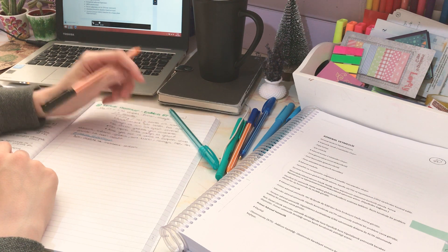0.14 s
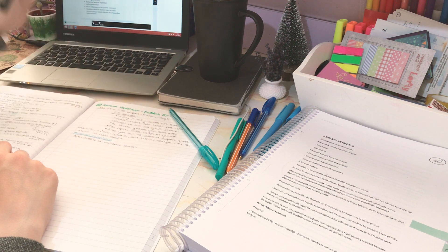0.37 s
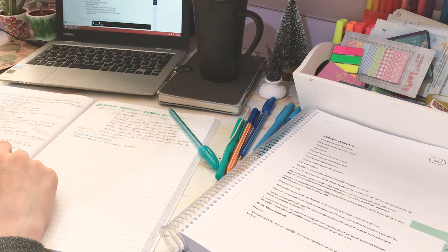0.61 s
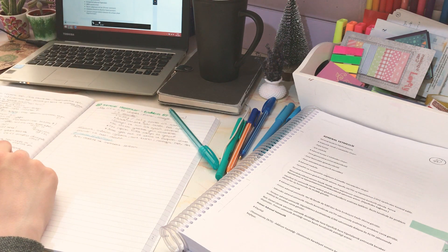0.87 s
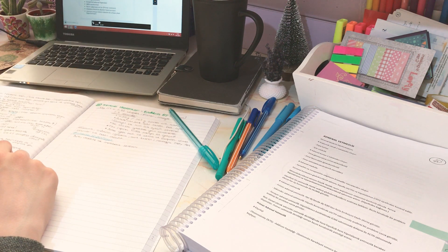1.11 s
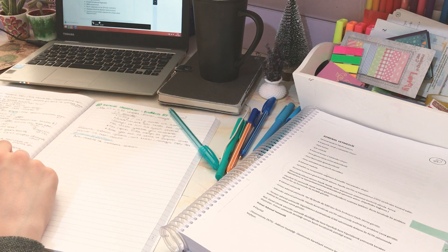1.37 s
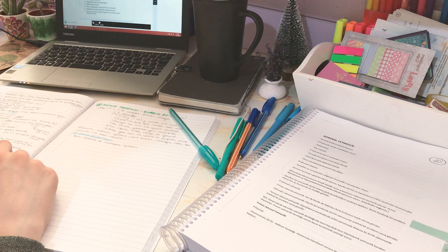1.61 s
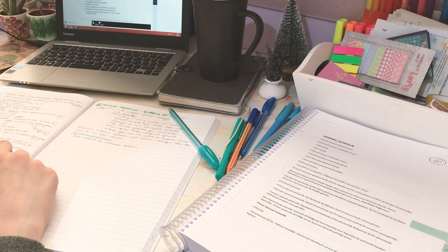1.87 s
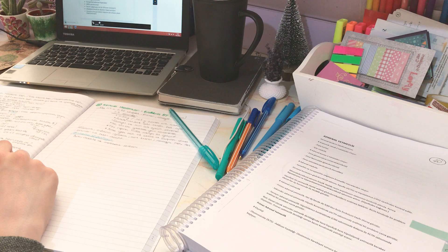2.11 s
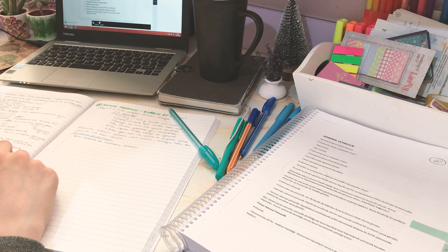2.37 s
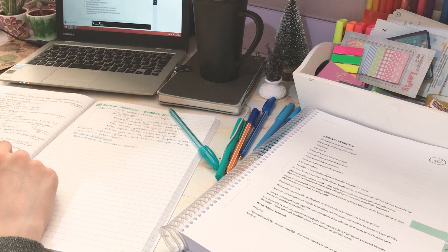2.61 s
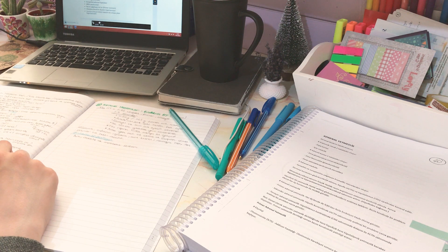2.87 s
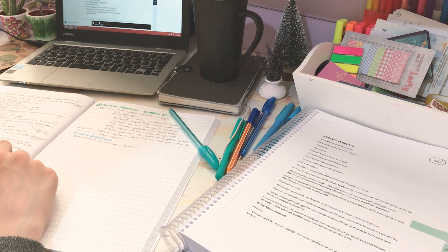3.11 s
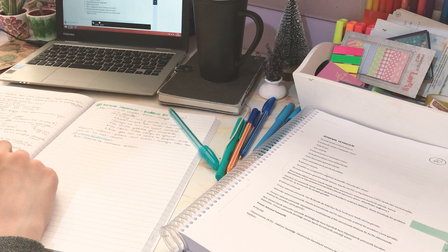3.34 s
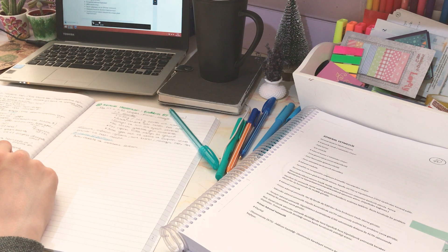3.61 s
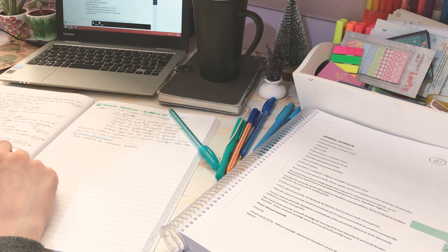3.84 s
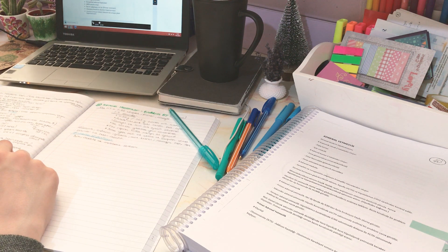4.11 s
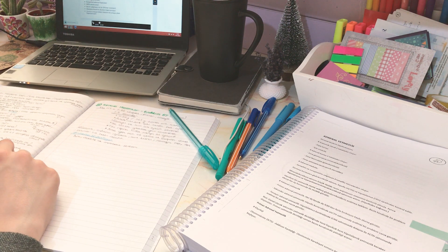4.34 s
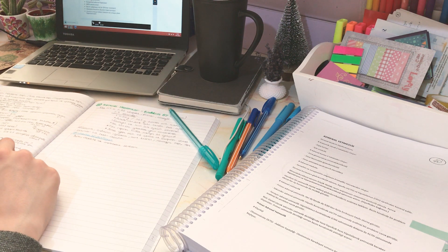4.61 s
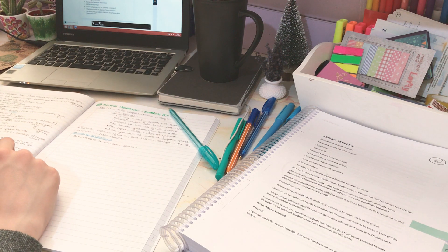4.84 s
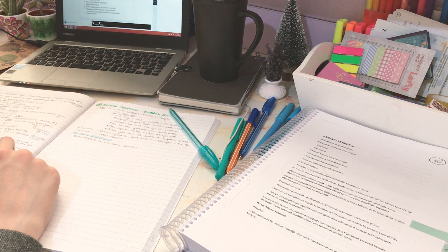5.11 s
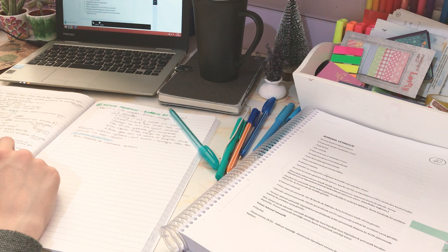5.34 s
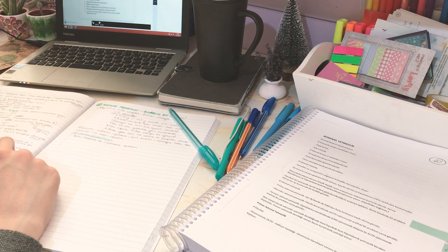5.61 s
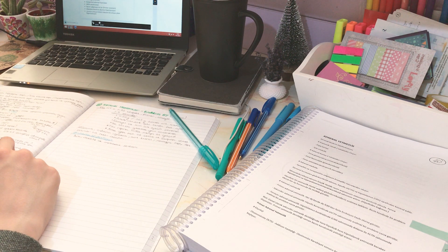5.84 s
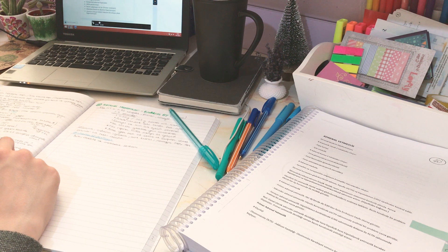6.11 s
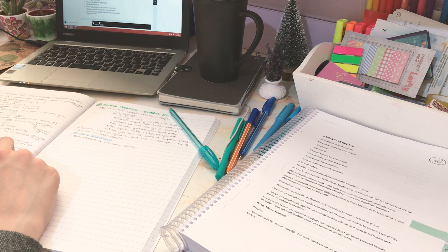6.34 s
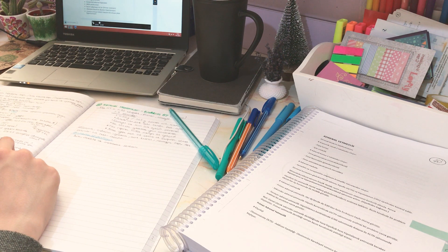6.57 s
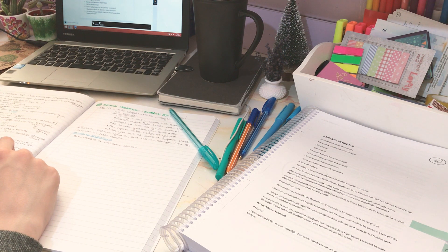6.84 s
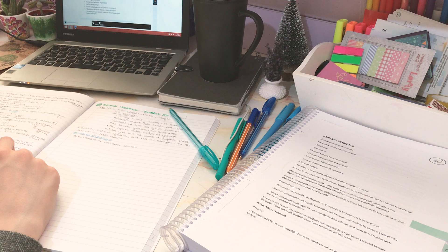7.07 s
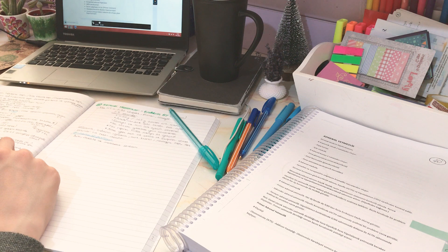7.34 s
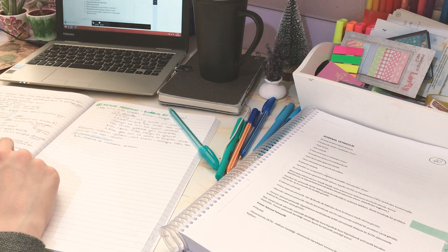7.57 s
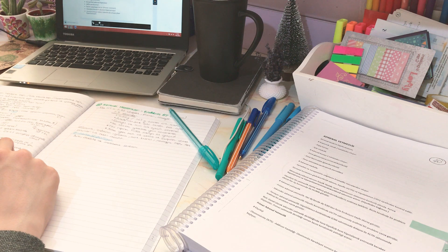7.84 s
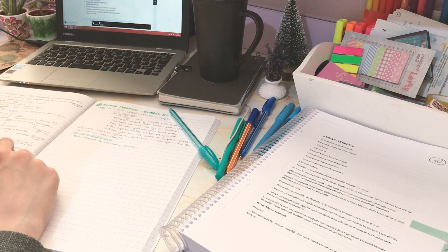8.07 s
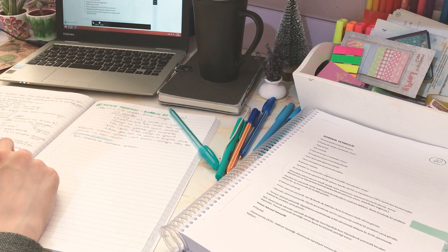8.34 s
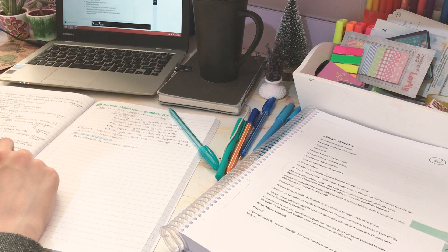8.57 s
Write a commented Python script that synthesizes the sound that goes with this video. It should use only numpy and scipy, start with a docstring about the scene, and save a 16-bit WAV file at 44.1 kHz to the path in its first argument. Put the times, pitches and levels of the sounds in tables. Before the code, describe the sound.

Close view of a desk in a quiet room with a low steady hum. After a second of near silence, a mug scrapes and clinks sharply, with knocks. Small muffled bumps follow, then faint fidgeting, a busy cluster of plastic clacks and ticks around five seconds, and a single hard thud at about six and a half, the loudest sound. A few light taps, then quiet. One microphone, short room tail.

```python
"""Objects handled on a wooden desk

In a quiet room small objects are knocked, shifted and set down on a desk; a mug clinks.
Each blow is a burst of chattering force that rings the desk's low thump and the object's clack;
hard contacts add ticks, taps ring single notes, slides are dense random slips, a short tail answers.
Behind them: low hum and room air, faint far drones and chirps, and swishes of cloth and paper.
One microphone hears it all, cutting the deepest bass and dipping in three treble bands."""
import sys
import numpy as np
from scipy import signal
from scipy.fft import rfft, irfft, next_fast_len
from scipy.io import wavfile
from scipy.ndimage import uniform_filter1d

SR = 44100
rng = np.random.default_rng(int(sys.argv[2]) if len(sys.argv) > 2 else 0)


def waveform_to_disk(signal):
    """Save audio, clipped to [-1, 1], as 16-bit WAV at the path in sys.argv[1]."""
    frames = np.transpose(np.atleast_2d(signal))
    scaled = np.clip(frames, -1, 1) * 32767
    samples = np.round(scaled).astype(np.int16)
    wavfile.write(sys.argv[1], SR, samples)


def voltage_ratio(decibels):
    """Convert decibels (scalar or array-like) to amplitude ratios, 20 dB per decade."""
    exponent = np.asarray(decibels, float) / 20
    return 10 ** exponent


N = 383669  # length [samples]


def evened(x):
    """Scales to rms 1."""
    return x / np.sqrt(np.mean(x ** 2) + 1e-20)


def peaked(x):
    """Scales to peak 1."""
    return x / abs(x).max()


def steep(x, kind, hz):
    """A steep filter."""
    return signal.sosfilt(signal.butter(4, hz, kind, fs=SR, output="sos"), x)


def read(points, hz):
    """Looks up a spectrum on a log frequency axis."""
    f, value = np.transpose(points)
    return np.interp(np.log(hz + 1), np.log(f + 1), value)


def coloured(x, points):
    """Gives x the spectrum of the points, at rms 1."""
    size = next_fast_len(len(x))
    gain = voltage_ratio(read(points, np.fft.rfftfreq(size, 1 / SR)))
    return evened(irfft(rfft(x, size) * gain, size)[:len(x)])


def add(mix, s, sound):
    """Lays a sound into the mix at time s."""
    part = mix[round(s * SR):][:len(sound)]
    part += sound[:len(part)]


def level(strokes):
    """Gain over the whole scene: each stroke swells, holds and dies away."""
    t = np.arange(0, N / SR, 1 / 2000)
    gain = 0
    for s, db, rise, held, fall in strokes:
        outside = np.maximum((s - t) / rise, (t - s - held) / fall)
        gain = gain + voltage_ratio(db - 20 * np.maximum(outside, 0))
    return np.interp(np.arange(N) / SR, t, gain)


def ring(modes, force, near_hz=None, db_per_octave=0.):
    """A force rings dying modes; where it lands favours the modes near one pitch."""
    hz, db, t60 = np.transpose(modes)[:, :, None]
    t = np.arange(SR // 6) / SR
    db = db + 3 * rng.standard_normal((12, 1))[:len(modes)]  # no two blows excite them alike
    if near_hz:
        db = db - db_per_octave * abs(np.log2(hz / near_hz))
    dying = voltage_ratio(db - 60 * t / t60) * np.sin(2 * np.pi * hz * t)
    return signal.fftconvolve(dying.sum(0), force)


def contact(ms, first, rise_ms=0.24):
    """One touch followed by a chatter of smaller ones that builds up quickly and dies."""
    t = np.arange(SR // 15) * 1000 / SR  # [ms]
    force = rng.standard_normal(len(t)) * voltage_ratio(1.37 * rng.exponential(1, len(t)))
    force = force * (1 - np.exp(-t / rise_ms)) * np.exp(-t / max(ms, .5))
    force[0] = first * np.sqrt(np.sum(force ** 2))
    return force


# colour of the room air: (frequency [Hz], relative level per Hz [dB])
AIR_COLOUR = [(15, -51), (25, -24.5), (48, 1.5), (66, -2), (82, -14), (114, -1.5), (213, -5), (366, -7),
              (455, -15), (630, -13.5), (1350, -14.5), (2250, -25), (10600, -34.5), (15000, -32.5),
              (16300, -45.5)]
# broad humps on that colour: (frequency [Hz], width [Hz], lift [dB])
AIR_HUMPS = [(608, 35, 4.5), (1315, 210, 1), (6300, 1800, 1.5), (15100, 780, 4)]
# course of the lows, used relative to its mean: (time [s], level [dB])
LOW_SWELL = [(0.0, -59.5), (1.04, -62.5), (1.62, -60.5), (2.64, -63), (3.51, -60.5), (4.53, -63),
             (5.01, -60.5), (6.95, -63), (8.7, -63.5)]


def air():
    """Random short-time spectra with faint patches; the lows swell with the traffic outside."""
    frames, hz = N // 512 + 5, np.fft.rfftfreq(2048, 1 / SR)
    a, b, patches = rng.standard_normal((frames, 1025, 3)).T
    patches = evened(uniform_filter1d(uniform_filter1d(patches, 16, 0), 8, 1))  # [dB]
    s, db = np.transpose(LOW_SWELL)
    swell_db = np.interp(np.arange(frames) * 512 / SR, s, db - db.mean())
    low_share = 1 / (1 + (hz / 2500) ** 2)
    humps_db = sum(lift_db / (1 + (2 * (hz - f) / width) ** 2) for f, width, lift_db in AIR_HUMPS)
    colour_db = (read(AIR_COLOUR, hz) + humps_db)[:, None]
    z = (a + 1j * b) * voltage_ratio(colour_db + low_share[:, None] * (patches + swell_db))
    return voltage_ratio(-64) * evened(signal.istft(z, nperseg=2048, noverlap=1536)[1][:N])


# machinery in the house: (frequency [Hz], width [Hz], level [dB])
HUM_TONES = [(52.9, 20, -70.5), (135, 60, -77.5)]


def hum():
    """Fuzzy low tones: noise in narrow resonances."""
    size = next_fast_len(N)
    f = np.fft.rfftfreq(size, 1 / SR)
    out = np.zeros(N)
    for hz, width, db in HUM_TONES:
        noise = rfft(rng.standard_normal(size))
        out += voltage_ratio(db) * evened(irfft(noise / (1 + (2 * (f - hz) / width) ** 2), size)[:N])
    return out


# far low tones: (start [s], end [s], first pitch [Hz], last pitch [Hz], level [dB])
DRONE_GLIDES = [(3.25, 4.35, 167, 170, -70), (4.9, 5.9, 141, 139, -66), (7.5, 8.2, 236, 176, -68)]


def drones():
    """Faint low tones from far outside, gliding evenly and wavering in level."""
    out, t = np.zeros(N), np.arange(N) / SR
    for start, end, first_hz, last_hz, db in DRONE_GLIDES:
        waver = 1 + .4 * evened(uniform_filter1d(rng.standard_normal(N), 2500))
        fade = np.clip(np.minimum(t - start, end - t) / 0.21, 0, 1)
        hz = np.interp(t, [start, end], [first_hz, last_hz])
        tone = np.sqrt(2) * np.sin(2 * np.pi * np.cumsum(hz) / SR)
        out += voltage_ratio(db) * fade * waver * tone
    return out


# faint far chirps, perhaps birds outside: (time [s], length [s], pitch [Hz], level [dB])
CHIRP_CALLS = [(0.744, .12, 3560, -78), (1.595, .07, 4330, -77), (2.9, .1, 3600, -82),
               (3.2, .08, 6450, -85), (3.32, .1, 5850, -86), (4.166, .12, 3420, -83),
               (7.646, .12, 3500, -83), (8.302, .12, 3530, -81)]


def chirps():
    """Fuzzy short whistles, blurred by distance: narrow noise that swells and fades."""
    out = np.zeros(N)
    for s, length, hz, db in CHIRP_CALLS:
        fuzz = steep(rng.standard_normal(SR // 4), "band", [.965 * hz, 1.035 * hz])
        shape = np.hanning(round(length * SR))
        add(out, s, voltage_ratio(db) * evened(fuzz)[-len(shape):] * shape)
    return out


# decay of the room's tail: (frequency [Hz], time to fall 60 dB [s])
ROOM_DECAY = [(150, 0.41), (500, 0.27), (1500, 0.36), (4000, 0.33), (10000, 0.26)]


def room(x):
    """Sparse taps of random sign, each band dying at its own speed; three tails take turns."""
    out, turn = np.zeros(N), np.arange(N) / SR * 9.
    for k in range(3):
        taps = np.zeros(SR)
        at = np.arange(150, SR - 20, 20)
        taps[at + rng.integers(0, 20, len(at))] = rng.choice([-1., 1.], len(at))
        hz, t, z = signal.stft(taps, SR, nperseg=256)
        decay = voltage_ratio(-60 * t / read(ROOM_DECAY, hz)[:, None])
        tail = signal.istft(z * decay, SR, nperseg=256)[1]
        window = np.sqrt(2 / 3) * np.cos(turn + k * np.pi / 3)
        out += signal.fftconvolve(x * window, tail / np.linalg.norm(tail))[:N]
    return out


# swishes, one list for each colour of swish:
# (peak time [s], level [dB], time to rise 20 dB [s], time held [s], time to fall 20 dB [s])
SWISHES = [
    [(0.15, -69, .04, .015, .05), (0.27, -68, .1, .04, .1)],
    [(6.598, -58, .006, .01, .07)],
    [(4.9, -74, .2, .3, .1), (6.33, -67, .015, .015, .03), (7.7, -79, .3, .45, .2),
     (8.272, -73, .02, .01, .06)],
]
# the colour of each list: (frequency [Hz], relative level per Hz [dB])
SWISH_COLOURS = [
    [(880, -28), (1500, -7), (1710, -2), (6000, -0.5), (10700, -5), (12700, -3), (16000, -11)],
    [(1180, -35), (2000, -5), (2640, -1), (3200, -21), (3810, -19), (4410, -15), (12500, -10), (16000, -11)],
    [(880, -32), (1500, -5), (1660, -1), (10300, -10), (15100, -8), (16000, -15)],
]


def sleeve():
    """Soft swishes of cloth and paper: coloured noise that swells and dies."""
    noise = rng.standard_normal(N)
    return sum(coloured(noise, colour) * level(rows) for rows, colour in zip(SWISHES, SWISH_COLOURS))


# slides and rattles, one list for each colour of scraping:
# (peak time [s], level [dB], time to rise 20 dB [s], time held [s], time to fall 20 dB [s])
SLIDE_STROKES = [
    [(1.025, -56, .03, .06, .03)],
    [(1.101, -38, .006, .04, .02)],
    [(1.153, -32.5, .004, .036, .022), (1.2, -47, .02, .03, .14)],
    [(1.27, -48.5, .05, .04, .13)],
    [(2.197, -57, .01, .005, .04), (2.285, -47, .09, .025, .07)],
    [(4.915, -60, .02, .065, .04), (5.125, -56, .012, .035, .02), (5.19, -47, .012, .01, .06)],
    [(6.37, -50, .008, .02, .1), (6.522, -59, .03, .03, .02)],
]
# the colour of each list: (frequency [Hz], relative level per Hz [dB])
SLIDE_COLOURS = [
    [(120, -46), (200, -8), (519, 0.5), (700, -9), (1250, -16), (2000, -38), (2600, -58), (4400, -120)],
    [(71, -53), (120, -24), (383, 4.5), (544, -4.5), (1590, -0.5), (1730, -7), (2740, -13.5), (8000, -40),
     (10400, -78), (17600, -120)],
    [(74, -38), (125, 0), (247, -1), (290, -2), (460, -8), (621, 5), (1070, 2), (3550, -15.5), (4080, -10),
     (5970, -20), (15000, -27)],
    [(88, -40), (150, -14), (264, 3), (705, -8), (846, -1), (1280, -11), (2080, -18.5), (8000, -37),
     (10400, -70), (17600, -120)],
    [(88, -53), (150, -23), (202, -27), (273, -9), (362, -27), (407, 5.5), (450, -8.5), (1370, -13.5),
     (8000, -58), (10400, -84), (17600, -120)],
    [(71, -36), (120, -4.5), (292, -2), (514, -13.5), (1380, -7), (1500, -18.5), (2690, -20), (15000, -36)],
    [(71, -38), (120, -10), (238, -3), (465, -30), (1110, -11), (2750, -37), (9620, -36), (15000, -40)],
]
# what rings along under a slide: (frequency [Hz], width [Hz], level [dB], not used)
RATTLE_MODES = [(225, 15, 0), (409, 21, -3), (860, 100, 0), (1180, 41, -1), (1456, 32, -9), (1614, 62, -7),
                (1860, 33, -8), (2223, 150, -12), (2720, 630, -14), (3420, 19, -18), (4030, 28, -4),
                (4500, 20, -15), (4360, 31, -11), (5370, 190, -17)]


def slides():
    """Dense slips of uneven size that come in clumps and ring what lies on the desk."""
    slips = rng.standard_normal(N) * voltage_ratio(1.5 * rng.exponential(1, N))
    slips = slips * (rng.random(N) < 6000 / SR)  # about 6000 slips a second
    slips = slips * voltage_ratio(2.1 * evened(uniform_filter1d(rng.standard_normal(N), 250)))  # clumps
    size = next_fast_len(N)
    f = np.fft.rfftfreq(size, 1 / SR)
    rings = 1 + sum(0.5 / (1 + 2j * (f - hz) / width) for hz, width, _ in RATTLE_MODES)
    slips = irfft(rfft(slips, size) * rings, size)[:N]
    return sum(coloured(slips, colour) * level(rows)
               for rows, colour in zip(SLIDE_STROKES, SLIDE_COLOURS))


# small hard things that ring on one note after a tap:
# (time [s], peak level [dB], pitch [Hz], time to fall 60 dB [s])
PING_TAPS = [(1.111, -38, 2720, .035), (6.366, -49, 1140, .12), (6.454, -51, 1100, .12),
             (5.065, -50, 2770, .1), (6.581, -54.5, 2630, .1), (6.581, -52.5, 3690, 0.067),
             (6.997, -64, 5150, .05), (6.522, -46, 1170, 0.11)]


def pings():
    """One short mode each, rung by a chattering touch."""
    out = np.zeros(N)
    for s, db, hz, t60 in PING_TAPS:
        add(out, s, voltage_ratio(db) * peaked(ring([(hz, 0, t60)], contact(ms=4., first=.8))))
    return out


# touches of the mug: (time [s], peak level [dB])
MUG_CLINKS = [(1.1518, -23), (1.165, -34), (1.2223, -42.5)]
# modes of the mug: (frequency [Hz], relative level [dB], time to fall 60 dB [s])
MUG_MODES = [(4080, -3, .09), (4023, 10, 0.085), (4140, -17, .1), (4600, -7, .06), (4550, -10, .06),
             (4700, -5, 0.13), (5400, -17, .08), (6260, -8, .05)]


def mug():
    """Glazed clay: a cluster of high modes, rattled by the touch."""
    out = np.zeros(N)
    for s, db in MUG_CLINKS:
        add(out, s, voltage_ratio(db) * peaked(ring(MUG_MODES, contact(ms=6., first=.7))))
    return out


# spells in which fingers fidget: (start [s], end [s])
FIDGET_SPELLS = [(3.3, 3.9), (4.5, 4.9), (5.4, 5.6)]
# middle peak level of a touch: (thump [dB], clack [dB], tick [dB], air [dB])
FAINT_DB = (-61, -59, -64, -76)
# pitches around which a touch is drawn: (thump [Hz], clack [Hz], tick [Hz])
FAINT_HZ = (170, 1000, 1850)


def touches():
    """Chance moments, levels and pitches: a knock row and a tick row for each faint touch."""
    per_s, spread_db = 11, 3.
    blows, taps = [], []
    for start, end in FIDGET_SPELLS:
        for when, size, a, b, c in rng.random((round((end - start) * per_s), 5)):
            s = start + when * (end - start)
            db = np.add(FAINT_DB, spread_db * (2 * size - 1))
            octaves = np.array([a, b, c / 2]) - .5  # the tick only goes down
            hz = np.multiply(FAINT_HZ, 2 ** octaves)
            blows.append((s, db[0], hz[0], db[1], hz[1]))
            taps.append((s, db[2], hz[2], db[3]))
    return blows, taps


# hard, small contacts: (time [s], tick peak level [dB], tick pitch [Hz], air peak level [dB])
HARD_CONTACTS = [(1.0999, -42, 2500, -66), (1.112, -39, 2000, -63.5), (1.1511, -31, 4300, -33),
                 (1.2229, -37, 4010, -48), (1.274, -37, 1860, -73), (1.489, -39, 2100, -46),
                 (1.4905, -46, 5000, -60), (1.8382, -44.5, 2300, -70), (2.1944, -57, 1850, -80),
                 (2.2742, -53, 2600, -80), (2.298, -53, 2300, -80), (3.143, -50, 4700, -52),
                 (3.1894, -55, 1830, -77), (4.6246, -47, 2680, -53.5), (4.661, -62, 2980, -58),
                 (4.7594, -65, 1910, -55), (4.8616, -54.5, 1900, -52), (4.9078, -60, 1810, -52),
                 (4.9157, -51, 1700, -59), (4.9232, -47, 2190, -55), (4.9727, -45, 1790, -64),
                 (4.9798, -41.5, 1750, -49), (5.0523, -48, 1990, -44), (5.0619, -39.5, 2800, -49),
                 (5.139, -43.5, 2740, -64), (5.1532, -40.5, 3590, -51), (5.1694, -52, 2620, -54),
                 (5.1902, -39.5, 1960, -45), (5.2194, -48, 2430, -67), (5.2344, -51, 2000, -70),
                 (5.475, -50, 2730, -69), (5.6618, -54, 2100, -76), (5.6825, -57, 3290, -79),
                 (5.767, -53.5, 1840, -77), (5.9472, -49.5, 1770, -82), (6.3654, -49.5, 3880, -40),
                 (6.3842, -48, 3400, -49), (6.3994, -50, 2120, -56), (6.419, -52, 2340, -48),
                 (6.4535, -51, 1750, -67), (6.4944, -61, 2440, -47), (6.5795, -40, 1800, -47),
                 (6.757, -59, 2470, -53.5), (6.7679, -46, 1930, -72), (6.995, -51, 2600, -52)]
# hard plastic, nearly dead: (frequency [Hz], width [Hz], relative level [dB])
PLASTIC_MODES = [(1700, 590, -0.5), (2100, 290, -7.5), (2670, 520, -0.5), (3220, 1100, 10.5),
                 (3680, 570, -2), (4350, 880, -1), (4450, 430, -1.5), (5640, 2000, 10)]


def ticks(rows):
    """Nearly dead plastic modes, and a puff of treble that thins toward the top."""
    out = np.zeros(N)
    # a mode's width gives its time to fall 60 dB
    plastic = [(hz, db, np.log(1000) / (np.pi * width)) for hz, width, db in PLASTIC_MODES]
    for s, tick_db, tick_hz, air_db in rows:
        force = contact(ms=4.3, first=0.073, rise_ms=0.82)
        tick = ring(plastic, force, tick_hz, db_per_octave=19.5)
        tick = steep(tick, "band", [1300., min(1.79 * tick_hz + 1350.0, 7000.)])
        puff = steep(signal.lfilter([1], [1, -.75], force), "high", 4960.0)
        add(out, s, voltage_ratio(tick_db) * peaked(tick))
        add(out, s, voltage_ratio(air_db) * peaked(puff))
    return out


# blunt blows: (time [s], desk thump peak level [dB], thump pitch [Hz],
# object clack peak level [dB], clack pitch [Hz])
BLUNT_BLOWS = [(1.098, -41, 360, -42, 678), (1.114, -55, 415, -35, 678), (1.151, -29.5, 300, -31, 603),
               (1.16, -30.5, 245, -26, 738), (1.222, -51, 245, -42, 899), (1.273, -44, 242, -40.5, 746),
               (1.487, -51.5, 416, -49, 1090), (1.839, -59, 126, -47.5, 1400), (2.195, -47, 417, -48, 616),
               (2.232, -53, 409, -47, 576), (2.279, -44, 405, -48, 606), (2.297, -45, 409, -44, 608),
               (3.066, -55, 220, -70, 673), (3.187, -54, 221, -49, 972), (3.209, -55, 215, -53, 961),
               (3.329, -56, 182, -48.5, 907), (4.525, -55.5, 169, -51.5, 1030),
               (4.673, -52.5, 161, -70, 657), (4.861, -59, 121, -50.5, 1110),
               (4.917, -66, 498, -48.5, 1180), (4.971, -49, 375, -47, 1340), (4.985, -43.5, 230, -45, 1230),
               (5.055, -53, 215, -45.5, 1030), (5.121, -44, 400, -51, 894), (5.139, -44, 215, -40, 1130),
               (5.154, -43.5, 400, -40.5, 1450), (5.187, -48.5, 205, -41.5, 1420),
               (5.219, -44, 202, -57, 1410), (5.427, -59, 132, -45, 1040), (5.475, -57, 130, -54, 1004),
               (5.662, -52.5, 210, -44, 965), (5.685, -51, 135, -63, 573), (5.767, -56, 143, -49, 950),
               (5.946, -57, 156, -47, 935), (5.962, -54.5, 205, -49, 1480), (6.366, -43, 210, -43, 1120),
               (6.384, -38, 242, -43, 1140), (6.402, -46, 237, -48, 1100), (6.454, -53, 242, -45.5, 1020),
               (6.521, -46, 221, -41, 1180), (6.58, -19.5, 270, -18.5, 850), (6.596, -24.5, 255, -32, 800),
               (6.767, -42.5, 315, -35, 1260), (6.789, -49.5, 242, -47, 589), (6.814, -61, 218, -49, 627),
               (6.996, -70, 237, -51, 1360)]
# modes of the desk top: (frequency [Hz], relative level [dB], time to fall 60 dB left free [s])
DESK_MODES = [(127, 7, 0.058), (163, -15.5, 0.093), (215, -2, 0.23), (237, -5, 0.21), (292.6, 3, 0.12),
              (321, -8, 0.047), (354, -2.5, 0.046), (422, -6.5, .07)]
# modes of the objects: (frequency [Hz], relative level [dB], time to fall 60 dB left free [s])
OBJECT_MODES = [(580, -13, .04), (650, 2.5, 0.15), (690, -5.5, 0.04), (857, -18, 0.038), (900, -3, 0.074),
                (943, 6, 0.11), (1032, 19, 0.055), (1169, 17, 0.046), (1376, 13.5, 0.11), (1424, -14, 0.12)]


def knocks(rows):
    """Each blow rings desk and object; a hand on the object shortens both rings."""
    out = np.zeros(N)
    hold = [1, 1, .72]  # share of the free ring time left by the hand, in the last column
    for s, thump_db, thump_hz, clack_db, clack_hz in rows:
        blow = contact(ms=4.1, first=1.39)
        thump = ring(np.multiply(DESK_MODES, hold), blow, thump_hz, db_per_octave=18.0)
        clack = ring(np.multiply(OBJECT_MODES, hold), blow, clack_hz, db_per_octave=26.5)
        add(out, s, voltage_ratio(thump_db) * peaked(steep(thump, "band", [0.69 * thump_hz, 650.])))
        add(out, s, voltage_ratio(clack_db) * peaked(steep(clack, "band", [530., 1650.])))
    return out


def scene():
    """Desk sounds with their room tail over the quiet background."""
    room_db, tick_room_db = -9, 2  # the short ticks stir the room more than the blows
    soft_knocks, soft_ticks = touches()
    blows = knocks(BLUNT_BLOWS + soft_knocks) + mug() + slides() + pings()
    taps = ticks(HARD_CONTACTS + soft_ticks)
    tail = voltage_ratio(room_db) * room(blows + voltage_ratio(tick_room_db) * taps)
    background = air() + hum() + drones() + chirps() + sleeve()
    return (background + blows + taps + tail)[None]


def low_pass(x):
    """Removes everything above the highest recorded frequency."""
    return signal.sosfilt(signal.butter(12, 16000, fs=SR, output="sos"), x)


# treble dips of the microphone: (frequency [Hz], width [Hz], level [dB])
TREBLE_DIPS = [(4860, 410, -2.5), (7650, 500, -2.5), (10500, 630, -3)]


def record(dry):
    """The microphone cuts the deepest bass steeply and dips in three treble bands."""
    bass_cut_hz = 39.3
    size = next_fast_len(N)
    f = np.fft.rfftfreq(size, 1 / SR)
    dips_db = sum(db / (1 + (2 * (f - hz) / width) ** 2) for hz, width, db in TREBLE_DIPS)
    heard = irfft(rfft(dry, size) * voltage_ratio(dips_db), size)[:, :N]
    heard = steep(steep(heard, "high", bass_cut_hz), "high", bass_cut_hz)
    return low_pass(heard)


dry = scene()
out = record(dry)
waveform_to_disk(out)
```